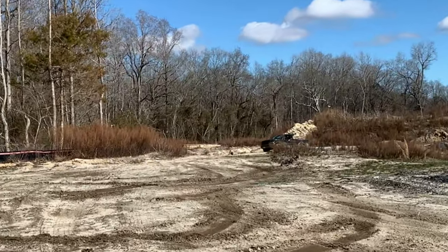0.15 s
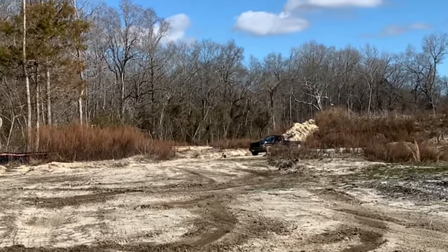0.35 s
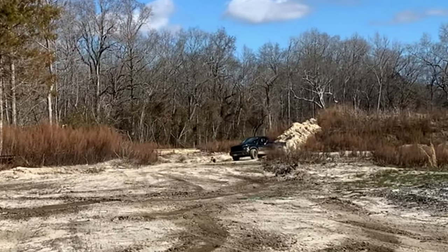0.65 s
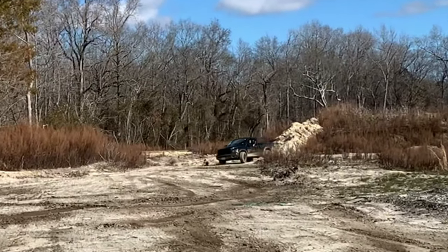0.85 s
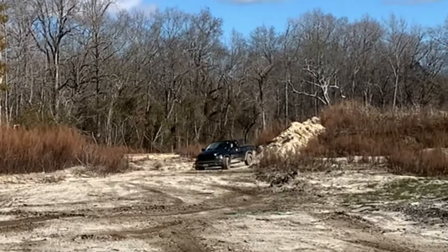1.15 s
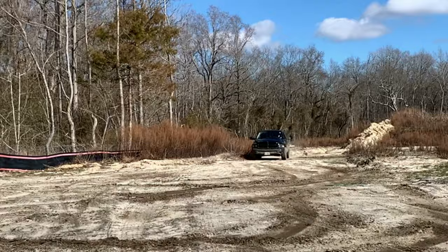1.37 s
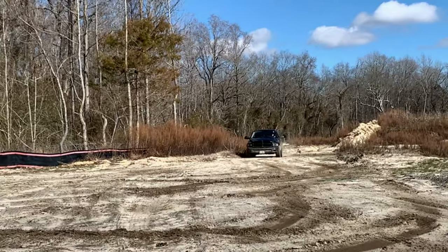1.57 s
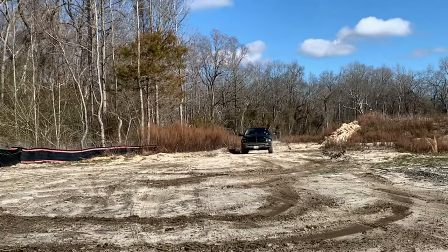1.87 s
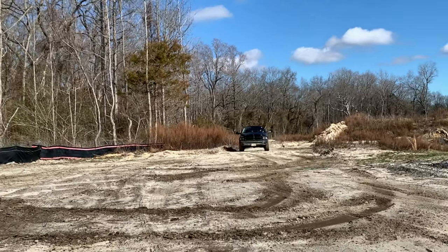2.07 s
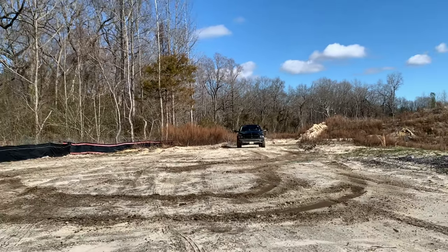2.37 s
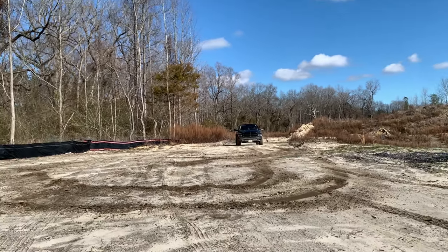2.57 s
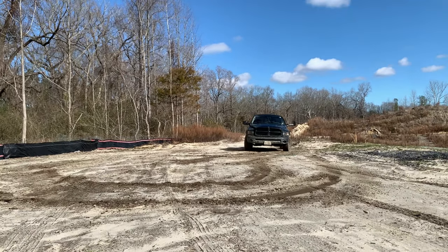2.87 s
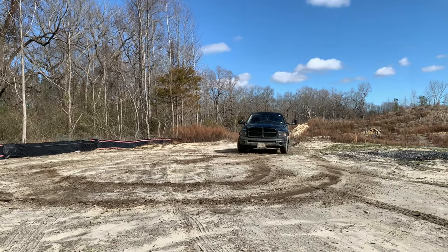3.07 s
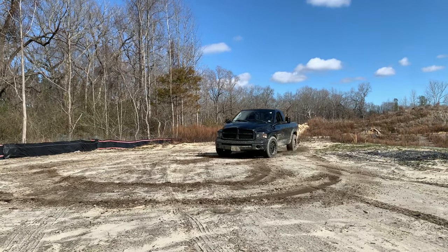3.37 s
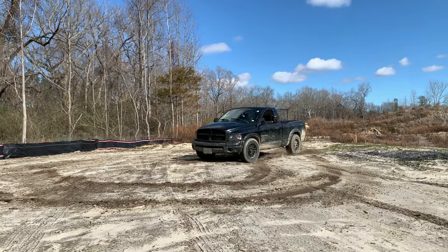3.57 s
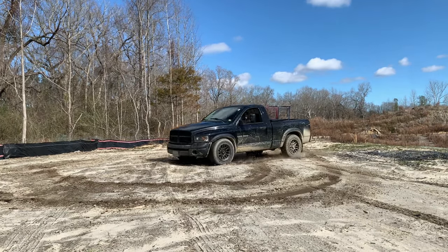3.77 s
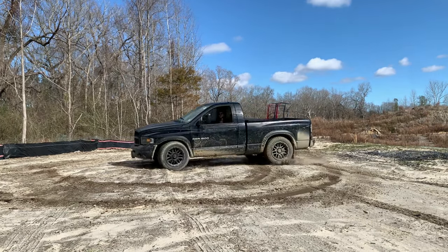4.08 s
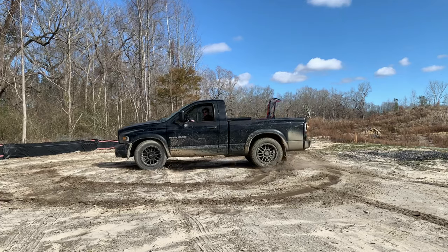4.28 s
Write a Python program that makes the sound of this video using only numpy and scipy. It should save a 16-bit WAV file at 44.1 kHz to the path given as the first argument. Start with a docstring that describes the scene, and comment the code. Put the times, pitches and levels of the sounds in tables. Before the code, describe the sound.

A pickup's V8 hums far off, revs hard and coasts, then passes close with thuds, rattles and spraying sand.

```python
"""A far V8 hum throbs across a sandy clearing: a pickup rolling over bumps. It is heard from three
microphone positions, joined end to end: far off, under full throttle then coasting, and close by over ruts.
Firing pulses make the exhaust note and burble, tyres churn sand and gravel, fan and intake hiss, and two
thin whistles sound under full throttle. Close up, sand sprays, the chassis knocks and loose steel clanks.
The microphone is a phone's pair of ports."""
import sys
import numpy as np
from scipy import signal
from scipy.fft import rfft, irfft, next_fast_len
from scipy.io import wavfile
from scipy.ndimage import uniform_filter1d

SR = 44100
rng = np.random.default_rng(int(sys.argv[2]) if len(sys.argv) > 2 else 0)


def store_pcm(level_fs):
    """Save levels as 16-bit WAV."""
    pcm = np.round(np.clip(level_fs, -1, 1) * 32767).astype(np.int16)
    wavfile.write(sys.argv[1], SR, np.atleast_2d(pcm).T)


N = 195272

FAR, PULL, NEAR = 0, 1, 2  # microphone positions, in order
FAR_END_S, NEAR_START_S = 1.4, 2.699
DULL_PER_DB, CLEAR_DB = 0.3035, -37  # hiss tilts down this many dB/octave per dB below CLEAR_DB

# Levels at the microphone, one list a position: t/s, exhaust/dB, tyres/dB, hiss/dB
LEVELS = [
    [(0.0, -31, -61, -69.5), (0.42, -30.5, -55, -73.5), (0.83, -29.5, -55, -72), (1.39, -29.5, -56.5, -69)],
    [(1.404, -19.5, -37, -56.5), (1.44, -16, -35, -56.5), (1.87, -17, -36.5, -53),
     (1.96, -14.5, -36.5, -51), (2.15, -15, -35.5, -51), (2.21, -18.5, -38.5, -54),
     (2.265, -27.5, -37.5, -54.5), (2.68, -28, -37.5, -55.5)],
    [(2.72, -28.5, -40.5, -54), (3.05, -29.5, -34, -50), (3.11, -22.5, -39, -50.5),
     (3.19, -23.5, -31.5, -46), (3.24, -27.5, -31.5, -45), (3.3, -21, -33, -43.5), (3.41, -22.5, -32, -43),
     (3.5, -21.5, -31.5, -38.5), (3.62, -18.5, -25.5, -33), (3.75, -24.5, -27.5, -29),
     (3.95, -20.5, -22.5, -28), (4.06, -23, -29, -29.5), (4.15, -20.5, -33.5, -28.5),
     (4.25, -17.5, -27.5, -25), (4.33, -20, -30.5, -27), (4.42, -17.5, -26.5, -28)],
]
# Bumps taken far off: t/s, tyre rise/dB, hiss rise/dB, crunch rise/dB, decay time/s
FAR_BUMPS = [(0.0, 3.5, 13.5, -12, 0.062), (0.45, 10, 7, 13.5, 0.16), (.56, 1, 6, 3, 0.09),
             (0.863, 4.5, 6.5, 9.5, 0.095), (1.041, 2.5, 2, 8, 0.091), (1.169, 8.5, 3, 11.5, 0.082),
             (1.28, 2, 4, 5, .08), (1.36, -9, 6.5, 11, 0.073)]
# Spectrum of fan and intake from afar: f/Hz, level/dB
FAN_SPECTRUM = [(1500, -2), (3000, -5.5), (4600, 7), (5200, -2.5), (6300, 3.5), (7800, 1), (8700, -7),
                (10200, 1), (11600, -10.5), (13500, -8), (15000, -15), (16500, -29)]
# Spectrum of flying sand close by: f/Hz, level/dB
SAND_SPECTRUM = [(1500, 12.5), (3000, 1), (4400, 3), (5300, -5), (6300, -0.5), (7100, 2.5), (11700, 2),
                 (12800, 5.5), (13800, 2), (14600, 4), (16500, 1)]
# Sand thrown from the ruts: t/s, level/dB, t60/s
SAND_PUFFS = [(2.786, -29.5, 0.042), (2.96, -43, 0.14), (3.085, -41, 0.13), (3.554, -40.5, 0.66),
              (3.717, -26.5, 0.23), (3.871, -20.5, 0.26), (3.975, -31, 0.091), (4.075, -20, 0.12),
              (4.179, -25, 0.11), (4.252, -35, 0.14), (4.309, -27, 0.29)]
# Spectrum of gravel under the wheels: f/Hz, level/dB
GRAVEL_SPECTRUM = [(400, -23), (800, 2), (1500, -5.5), (2800, -6), (4000, -20.5), (6000, -31)]
# Gravel crunch as the pickup nears: t/s, level/dB
NEAR_CRUNCH = [(2.7, -53), (2.95, -49.5), (3.2, -47), (3.6, -46.5), (4.43, -39.5)]
# Spectrum of tread churning sand: f/Hz, level/dB
TYRE_SPECTRUM = [(120, -18.5), (200, -2.5), (232, 1.5), (284, -4), (419, -3.5), (889, -14.5), (1790, -26.5),
                 (3530, -36.5), (5200, -47), (8800, -120)]
# Two whistles at the middle position: t/s, lower whistle/dB, upper whistle/dB
WHISTLE_LEVELS = [(1.41, -85, -55), (1.55, -71.5, -60), (1.7, -64.5, -64.5), (2.04, -59, -59),
                  (2.085, -54, -65), (2.12, -72, -80), (2.3, -67, -93), (2.6, -83, -96)]
# Modes of loose steel in the bed: f/Hz, level/dB, t60/s
STEEL_MODES = [(1037, -11.5, 0.2), (1686, -13, 0.085), (1974, -4.5, 0.049), (2300, -7.5, 0.02),
               (2840, -9, 0.025), (4440, -15, 0.021)]
# Strikes of that steel: t/s, level/dB, pitch ratio of the spot struck
CLANKS = [(2.788, -41, 1), (3.72, -41, 0.71), (3.863, -23, .85), (3.886, -41, .76), (3.978, -22.5, 1.1),
          (4.0726, -19.5, 0.91), (4.0766, -17, 1), (4.086, -28, 1.0), (4.255, -23.5, 1.1),
          (4.33, -28, 1.02)]
# Body panel resonances: f/Hz, width/Hz, relative level/dB
PANEL_MODES = [(319, 18, 7.5), (443, 4.1, -2), (500, 54, 9), (738, 21, -1.5), (1090, 250, -7.5),
               (1770, 160, -11.5), (3120, 2300, -41)]
# Chassis knocks over ruts: t/s, rattle/dB, thud/dB, thud f/Hz, rattle tilt/(dB/octave), rattle t60/s
KNOCKS = [(2.786, -16, -22, 109.4, 0, 0.043), (2.796, -14.5, -12.5, 398, 1, 0.05),
          (2.808, -24, -33, 682, -3.5, 0.28), (2.844, -48, -15.5, 158, 4, 0.095),
          (3.074, -29, -14.5, 76.3, 4, 0.17), (3.111, -23, -7, 124.3, 2, 0.076),
          (3.151, -33, -12.5, 149.6, 12, 0.12), (3.216, -20, -9, 117, 4.5, 0.12),
          (3.237, -18.5, -22, 264, -4, 0.11), (3.258, -25, -11.5, 76.7, -2, 0.2),
          (3.367, -27, -13, 138.6, -2, .14), (3.398, -21, -18.5, 93, 3, 0.19),
          (3.519, -25, -12, 90.2, -1, .1), (3.56, -39, -8, 76.3, -9, 0.075),
          (3.55, -25.5, -20.5, 220.6, 9.5, 0.98), (3.609, -25, -8, 144.5, -8, 0.035),
          (3.711, -12, -18, 145.6, 3.5, 0.21), (3.819, -24, -5.5, 149.4, -4, 0.071),
          (3.845, -32, -9.5, 180, 8, 0.062), (3.87, -9, -7, 226, -5.5, 0.21),
          (3.885, -8.5, -16, 286, -1, 0.098), (3.9, -10.5, -13, 428, -2, 0.14),
          (3.923, -21.5, -17, 338, 1, 0.12), (3.974, -26, 3.5, 185, 1, 0.049),
          (3.994, -20, -9, 152, 10.5, 0.1), (4.077, -9, -1.5, 165.8, 0.5, 0.18),
          (4.099, -13, -8.5, 257, -7, 0.054), (4.145, -16.5, -17, 166, 3, 0.14),
          (4.253, -23, -19, 196, 12, 0.096), (4.289, -15.5, -10, 103.6, 5, 0.4),
          (4.336, -10, -5.5, 259, -2, 0.085), (4.346, -15, -15.5, 525, -9, 0.14),
          (4.366, -15, -18.5, 119, -12, 0.093)]
# Engine speed, one cycle being two crank turns: t/s, cycle f/Hz
ENGINE_SPEED = [(0, 14.6), (.55, 16.3), (.86, 16.4), (1.395, 17.9), (1.4, 19.6), (1.72, 19.66),
                (1.82, 19.8), (2.17, 19.8), (2.25, 19.2), (2.3, 16.5), (2.45, 14.1), (2.69, 14), (2.71, 16),
                (4.43, 20)]
# Exhaust orders; uneven firing within each bank stresses 3, 5, 8, 11 and 13:
# multiple of the cycle, relative level far off/dB, relative level at the other positions/dB
ORDERS = [(2, -29, -41.5), (3.023, -6.5, -12.5), (4.02, -25, -32), (5.006, 8.5, -18.5), (5.8, -10, -40.5),
          (7.5, -29.5, -37.5), (8.014, 10, 2), (9, -11.5, -23), (10, -39, -19.5), (11, -6, -7.5),
          (12.9, -11.5, -12.5), (15, -22.5, -46), (15.97, -3, -13), (16.95, -6.5, -22), (18.93, -8.5, -25),
          (20.17, -8.5, -56), (20.93, -35.5, -19.5), (22.13, -12.5, -43), (23.94, -37, -23),
          (26.3, -24.5, -38), (27.2, -23, -35), (29.1, -17.5, -33.5), (32, -47.5, -32.5)]
# Throb of the far hum: t/s, orders under 8/dB, orders from 8 up/dB
FAR_THROB = [(0, -10.5, -7.5), (.3, -4.5, -4), (.37, 0.5, -4), (.42, -2.5, -6.5), (.47, -2, 8),
             (.526, 3.5, -9.5), (.59, -7, 2), (.68, -17, -10.5), (.78, 1.5, 1.5), (.835, -6, -8.5),
             (.89, -15.5, 3), (1.04, 2.5, -4), (1.17, 4.5, 1), (1.27, -0.5, 2), (1.315, -9, 1),
             (1.39, -4, 4.5)]
# Spectrum of the exhaust burble, one list a position: f/Hz, level/dB
BURBLE_SPECTRA = [
    [(18, -59), (30, -31.5), (70, -20.5), (140, -4), (161, -5.5), (292, -18.5), (389, -26.5), (436, -36),
     (587, -37), (900, -38), (1170, -41), (1980, -120)],
    [(18, -34.5), (30, -1), (118, 2), (243, -4), (280, -11), (389, -21.5), (517, -23), (687, -24.5),
     (900, -21.5), (1170, -47), (1980, -120)],
    [(18, -36), (30, -16), (65, 3), (173, 0.5), (226, 0.5), (288, -8), (318, -4.5), (423, -13.5),
     (900, -25.5), (1170, -74.5), (1980, -120)],
]
# Phase lead of the left port: f/Hz, lead/rad
LEFT_LEAD = [(0, 0), (1800, -.5), (2600, 0), (4450, -.1), (5400, -2.2), (6300, -1.6), (7900, -2.6),
             (8650, -3.14), (10650, -6.1), (11400, -6.5), (12500, -8.5), (13450, -9.42), (15500, -12.4),
             (16600, -12.6)]
# Left port's level over the right: f/Hz, level/dB
LEFT_LEAN = [(60, -1.5), (120, -8), (250, -1.5), (700, -1.5), (1500, 0), (3000, -1), (4450, -2.5),
             (5000, -8.5), (6300, -4), (7500, 5), (16000, -2)]
# Likeness of the two ports: f/Hz, coherence (0-1)
COHERENCE = [(30, .88), (70, .93), (150, .995), (300, .995), (500, .97), (1200, .95), (2500, .985),
             (3300, .93), (4400, .98), (5200, .65), (6500, .75), (8600, .99), (9700, .9), (11000, .99),
             (12000, .9), (13450, .995), (14600, .92), (15700, .99)]
# Distance scatters the mids, bearing turns the low treble: t/s, coherence lost (0-1), extra lead/rad
BEARING = [(1.39, 0.53, -0.52), (1.41, 0.099, -0.31), (2.69, 0.12, -0.27), (2.71, 0.16, 0.34),
           (3.4, .02, 0)]
# Those two bands: f/Hz, weight
MIDS = [(480, 0), (700, 1), (3200, 1), (4200, 0)]
LOW_TREBLE = [(4500, 0), (5000, 1), (7700, 1), (9000, 0)]
# Snaps where the wave jumps between positions: t/s, level/dB
JOIN_SNAPS = [(1.395, -36), (1.4063, -24), (2.7008, -30.5)]


def gain_of(db):
    """Decibels to gain."""
    return 10 ** (np.asarray(db) / 20)


def unit_rms(x):
    """Scales to rms 1."""
    return x / np.sqrt(np.mean(x ** 2) + 1e-20)


def at_hz(points, hz):
    """Reads a spectrum on a log-frequency axis."""
    f, value = np.transpose(points)
    return np.interp(np.log(hz + 1), np.log(f + 1), value)


def curves(rows, t):
    """Each column of a table as a curve over the times t."""
    times, *columns = np.transpose(rows)
    return [np.interp(t, times, column) for column in columns]


def coloured(x, spectrum):
    """Gives x the spectrum through a minimum-phase filter, at rms 1."""
    db = np.maximum(at_hz(spectrum, abs(np.fft.fftfreq(8192, 1 / SR))), -100)
    response = np.exp(np.conj(signal.hilbert(np.log(gain_of(db)))))
    taps = np.fft.ifft(response).real[:4096]
    return unit_rms(signal.oaconvolve(x, taps)[:len(x)])


def resonate(x, hz, width_hz):
    """A resonance that can glide: shifts hz down to zero, smooths, and shifts back."""
    carrier = np.exp(2j * np.pi * np.cumsum(hz * np.ones(len(x))) / SR)
    pole = np.exp(-np.pi * width_hz / SR)
    return 2 * (carrier * signal.lfilter([1 - pole], [1, -pole], x / carrier)).real


def wander(samples):
    """Random drift of rms 1, smooth over the given span."""
    return unit_rms(uniform_filter1d(uniform_filter1d(rng.standard_normal(N), samples), samples))


def grit(per_s, spread_db, bed):
    """Grains of random size over a bed of even noise."""
    sizes = gain_of(spread_db * np.minimum(rng.exponential(1, N), 5))
    hits = rng.random(N) < per_s / SR
    return unit_rms(bed * rng.standard_normal(N) + unit_rms(sizes * hits * rng.choice([-1, 1], N)))


def tilted(t, x, tilt):
    """Tilts the treble about 5 kHz by a moving number of dB per octave."""
    hz, frames, spectra = signal.stft(x, SR, nperseg=256)
    octaves = np.log2(np.maximum(hz, 1000) / 5000)[:, None]
    return signal.istft(spectra * gain_of(octaves * np.interp(frames, t, tilt)), SR, nperseg=256)[1][:N]


def jolt(since, t60, rise_s=0.0027):
    """Quick rise, then an exponential fall."""
    return (1 - np.exp(-since / rise_s)) * gain_of(-60 * since / t60)


def far_bumps(t, rise_s=0.028):
    """Tyres, hiss and crunch flare at each distant bump: three curves in dB."""
    start, *rises_db, decay_s = np.transpose(FAR_BUMPS)[:, :, None]
    since = np.maximum(t - start, 0)
    flare = np.minimum(since / rise_s, 1) * np.exp(-since / decay_s) * (t < FAR_END_S)
    return [(db * flare).sum(0) for db in rises_db]


def hiss(t, level_db, extra_tilt):
    """Fan and intake from afar, spraying sand close by; the air dulls both with distance."""
    tilt = DULL_PER_DB * (level_db - CLEAR_DB) + extra_tilt
    sand_share = np.clip(.4 + .68 * (t - NEAR_START_S), 0, .96) * (t > NEAR_START_S)
    grains = grit(per_s=5000, spread_db=-2.0, bed=1.42)
    fan = (1 - sand_share) * coloured(grains, FAN_SPECTRUM)
    sand = sand_share * coloured(grains, SAND_SPECTRUM)
    return gain_of(level_db + 0.98 * wander(samples=600)) * tilted(t, fan + sand, tilt)


def whistles(t, upper_hz=15450):
    """Two thin whistles under full throttle; the lower sags and both fade just before it closes."""
    lower_db, upper_db = curves(WHISTLE_LEVELS, t)
    lower_hz = np.interp(t, (2.07, 2.18), (10520, 10130))
    sounding = (t > WHISTLE_LEVELS[0][0]) & (t < WHISTLE_LEVELS[-1][0])
    air = rng.standard_normal(N)
    lower = unit_rms(resonate(resonate(air, lower_hz, 280), lower_hz, 280))
    upper = unit_rms(resonate(resonate(air, upper_hz, 600), upper_hz, 600))
    return sounding * (gain_of(lower_db) * lower + gain_of(upper_db) * upper)


def puff_gain(t):
    """Envelope of all the sand puffs together."""
    return sum(gain_of(db) * jolt(np.maximum(t - start, 0), t60) for start, db, t60 in SAND_PUFFS)


def gravel_crunch(t, rise_db, far_db=-71, puff_db=-11.5):
    """Gravel cracks in clumps under the wheels: far off, close by, and with each puff of sand."""
    grains = coloured(grit(per_s=900, spread_db=1.1, bed=.9), GRAVEL_SPECTRUM)
    clumps = gain_of(2 * wander(samples=350))
    far = (t < FAR_END_S) * gain_of(far_db + rise_db)
    near = (t > NEAR_START_S) * gain_of(curves(NEAR_CRUNCH, t)[0])
    return (far + near + gain_of(puff_db) * puff_gain(t)) * clumps * grains


def sand_puffs(t, hiss_db):
    """Sand bursts from under the wheels, dulled less by distance than the hiss is."""
    grains = coloured(grit(per_s=4500, spread_db=1.5, bed=1.4), SAND_SPECTRUM)
    tilt = 0.43 * DULL_PER_DB * np.minimum(hiss_db - CLEAR_DB, 0)
    return tilted(t, grains, tilt) * puff_gain(t)


def tyres(level_db):
    """Tread blocks crush and churn the sand in lumps."""
    lumps = gain_of(level_db + 0.97 * wander(samples=500))
    return lumps * coloured(grit(per_s=1700, spread_db=-1.5, bed=1.7), TYRE_SPECTRUM)


def steel_clanks(rise_s=.0004):
    """Loose steel jumps in the bed and rings briefly, close to the microphone."""
    out, since = np.zeros(N + SR), np.arange(SR // 8) / SR
    hz, mode_db, t60 = np.transpose(STEEL_MODES)[:, :, None]
    phases = rng.random((len(CLANKS), len(STEEL_MODES), 1))
    for (start, db, ratio), phase in zip(CLANKS, phases):
        modes = gain_of(db + mode_db - 60 * since / t60) * np.sin(2 * np.pi * (hz * ratio * since + phase))
        out[round(start * SR):][:len(since)] += np.minimum(since / rise_s, 1) * modes.sum(0)
    return out[:N]


def chassis_knocks():
    """Close by, each rut rings the frame low, and strikes and rattles the panels."""
    out, since = np.zeros(N + SR), np.arange(SR // 2) / SR
    panel_hz, width_hz, panel_db = np.transpose(PANEL_MODES)[:, :, None]
    shaken = np.array([unit_rms(resonate(rng.standard_normal(N + SR), f, w)) for f, w, _ in PANEL_MODES])
    detunes = rng.uniform(.96, 1.04, (len(KNOCKS), len(PANEL_MODES), 1))
    for (start, rattle_db, thud_db, thud_hz, tilt, t60), detune in zip(KNOCKS, detunes):
        span = slice(round(start * SR), round(start * SR) + len(since))
        share = gain_of(panel_db + tilt * np.log2(panel_hz / 500))
        struck = 0.5 * np.exp(-np.pi * width_hz * since) * np.sin(2 * np.pi * panel_hz * detune * since)
        rattle = (share / share.sum() * (struck + jolt(since, t60) * shaken[:, span])).sum(0)
        thud = jolt(since, 0.78 * t60) * np.sin(2 * np.pi * thud_hz * since)
        out[span] += gain_of(rattle_db) * rattle + gain_of(thud_db) * thud
    return out[:N]


def exhaust_note(t, position, cycles, far_waver_db=2.2, pull_waver_db=.7):
    """Wavering orders of the firing cycle: a throbbing hum far off, a steadier note after that."""
    far, pull = np.zeros((2, N))
    throb_db = curves(FAR_THROB, t)
    for order, far_db, pull_db in ORDERS:
        lag = np.pi * order ** 2 / 16  # the pipes spread the side orders; multiples of 8 stay in step
        tone = np.cos(2 * np.pi * order * cycles + lag + .11 * wander(samples=2500))
        waver = wander(samples=2500)
        far += gain_of(far_db + throb_db[int(order >= 8)] + far_waver_db * waver) * tone
        pull += gain_of(pull_db + pull_waver_db * waver) * tone
    return np.where(position == FAR, unit_rms(far), unit_rms(pull))


def exhaust_burble(position, cycles):
    """Eight firings a cycle, uneven in timing and strength, sound through the pipes."""
    firings = np.diff(np.floor(8 * cycles + .25 * wander(samples=150)), prepend=0) > 0
    pulses = firings * rng.standard_normal(N) * gain_of(1.5 * wander(samples=700))
    pulses += .09 * rng.standard_normal(N)
    return np.choose(position, [coloured(pulses, spectrum) for spectrum in BURBLE_SPECTRA])


def exhaust(t, position, throttle, level_db):
    """The V8's tailpipe: the rougher the firing, the more burble and the less note."""
    cycles = np.cumsum(curves(ENGINE_SPEED, t)[0]) / SR
    far_roughness = np.interp(t, [0, 1.05], [.52, .38])
    pull_roughness = np.interp(throttle, [0, 1], [.85, .16])
    roughness = np.choose(position, [far_roughness, pull_roughness, .97])
    note = np.sqrt(1 - roughness ** 2) * exhaust_note(t, position, cycles)
    burble = roughness * exhaust_burble(position, cycles)
    return gain_of(level_db) * (note + burble)


def pickup(t, lift_s=2.21, closing_s=.09):
    """All the pickup sends to the microphone; the throttle starts to close at lift_s."""
    position = np.searchsorted([FAR_END_S, NEAR_START_S], t)
    throttle = (position == PULL) * np.clip(1 - (t - lift_s) / closing_s, 0, 1)
    exhaust_db, tyre_db, hiss_db = curves(sum(LEVELS, []), t)
    tyre_rise, hiss_rise, crunch_rise = far_bumps(t)
    hiss_tilt = 3 * throttle + 1.9 * (position == PULL)  # dB/octave; some brightness stays while coasting
    return (exhaust(t, position, throttle, exhaust_db) + tyres(tyre_db + tyre_rise)
            + hiss(t, hiss_db + hiss_rise, hiss_tilt) + gravel_crunch(t, crunch_rise)
            + chassis_knocks() + steel_clanks() + sand_puffs(t, hiss_db) + whistles(t))


def scene():
    """The pickup at two ports that differ in phase and level; the right also takes scattered sound."""
    t = np.arange(N) / SR
    direct = pickup(t)
    hz, frames, spectra = signal.stft(direct, SR, nperseg=512)
    scrambled = spectra * np.exp(2j * np.pi * rng.random(spectra.shape))
    scattered = signal.istft(scrambled, SR, nperseg=512)[1][:N]
    lost, extra_lead = curves(BEARING, frames)
    coherence = np.clip(at_hz(COHERENCE, hz)[:, None] * (1 - np.outer(at_hz(MIDS, hz), lost)), 0, 1)
    scatter_gain = np.sqrt(3 * (1 - coherence ** 2))  # 3: random phases lose power in the overlap
    mixed = coherence * spectra + scatter_gain * signal.stft(scattered, SR, nperseg=512)[2]
    bearing_lag = np.exp(-1j * np.outer(at_hz(LOW_TREBLE, hz), extra_lead))
    right = signal.istft(mixed * bearing_lag, SR, nperseg=512)[1][:N]
    size = next_fast_len(N + 2048)
    bin_hz = np.fft.rfftfreq(size, 1 / SR)
    lead = np.interp(bin_hz, *np.transpose(LEFT_LEAD))
    lean = gain_of(at_hz(LEFT_LEAN, bin_hz) / 2) * np.exp(.5j * lead)  # half to each port
    return irfft(np.array([rfft(direct, size) * lean, rfft(right, size) / lean]), size)[:, :N]


def record(dry, self_noise_db=-85, gap_s=(2.697, 2.7012), edge_hz=15850):
    """The phone: self-noise, rumble cut, a gap and snaps at the joins, soft overload, band limit."""
    t = np.arange(N) / SR
    rumble_cut = signal.butter(N=4, Wn=38., btype="high", fs=SR, output="sos")
    ports = signal.sosfilt(rumble_cut, dry + gain_of(self_noise_db) * rng.standard_normal(dry.shape))
    ports *= np.clip(np.maximum(gap_s[0] - t, t - gap_s[1]) / .0004, 0, 1)  # a blink of silence
    for start, db in JOIN_SNAPS:
        ports += (t > start) * gain_of(db) * np.exp(-abs(t - start) / .003)
    ports = 1.4 * np.tanh(ports / 1.4)  # the loudest thuds are rounded off
    band_limit = signal.firwin(1023, edge_hz, window=("kaiser", 9), fs=SR)
    return signal.oaconvolve(ports, band_limit[None], "same")


dry = scene()
out = record(dry)
store_pcm(out)
```